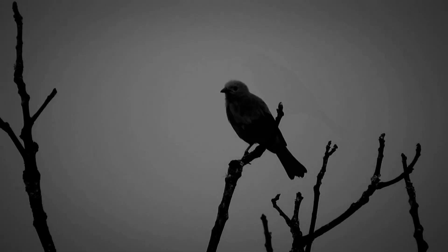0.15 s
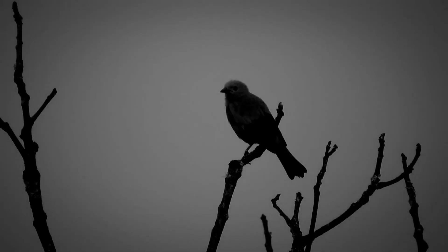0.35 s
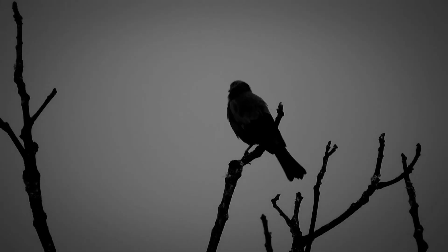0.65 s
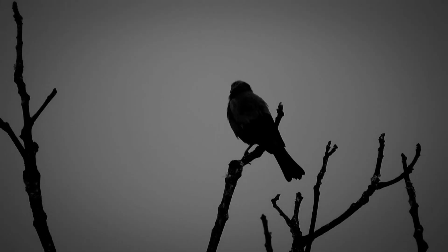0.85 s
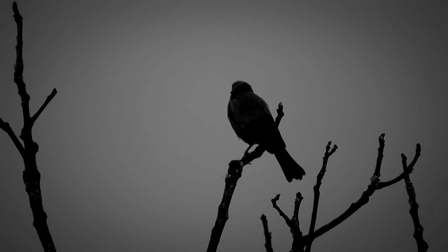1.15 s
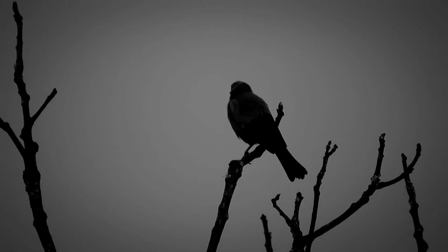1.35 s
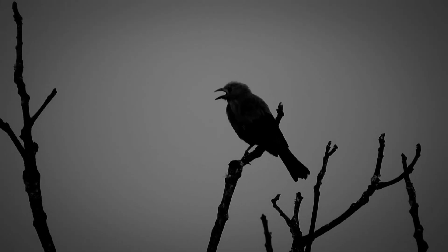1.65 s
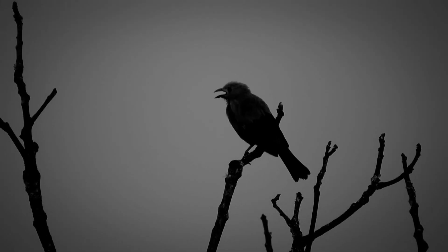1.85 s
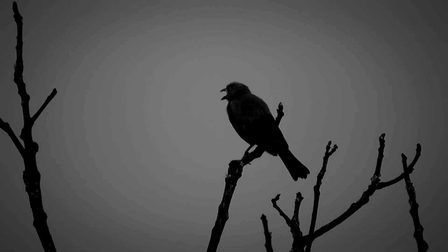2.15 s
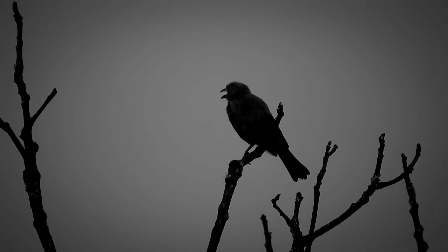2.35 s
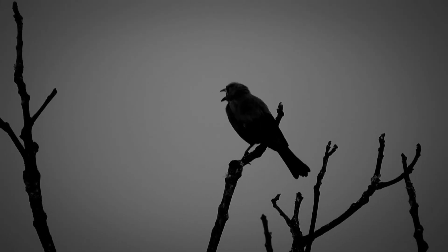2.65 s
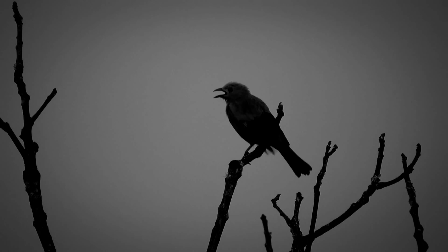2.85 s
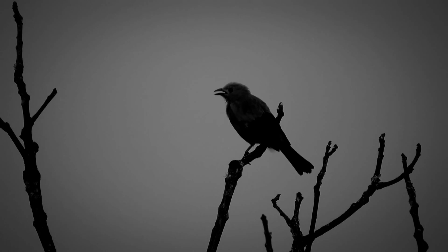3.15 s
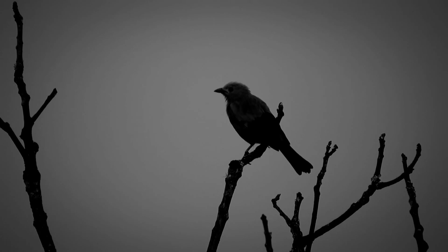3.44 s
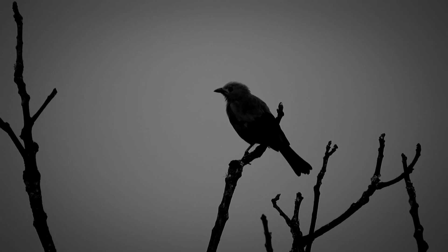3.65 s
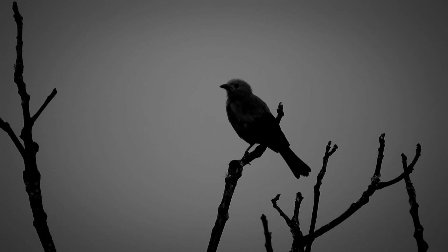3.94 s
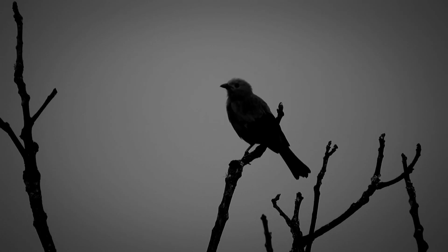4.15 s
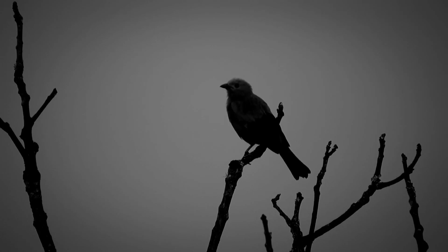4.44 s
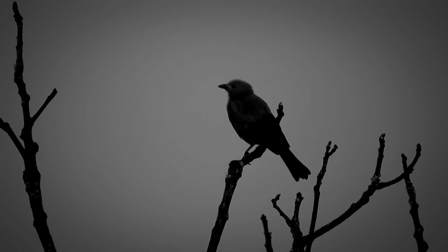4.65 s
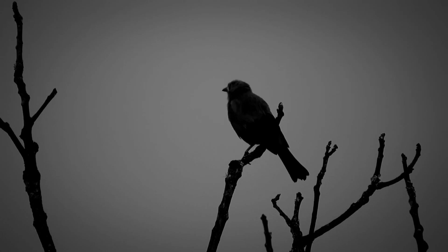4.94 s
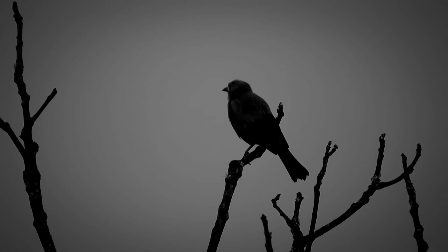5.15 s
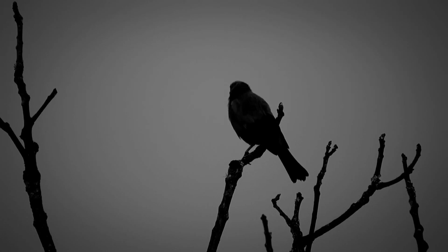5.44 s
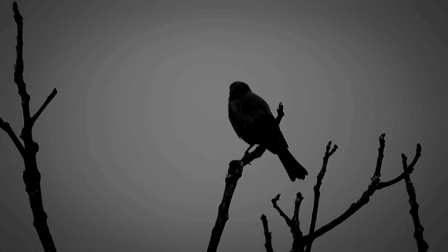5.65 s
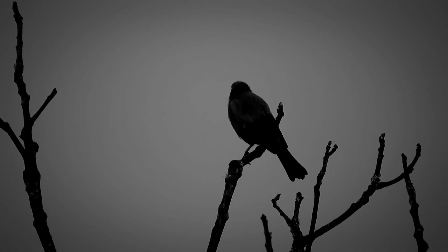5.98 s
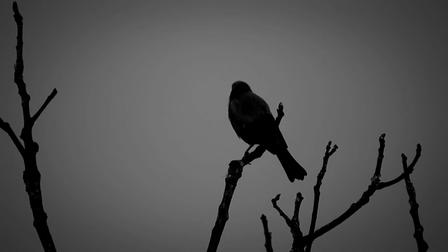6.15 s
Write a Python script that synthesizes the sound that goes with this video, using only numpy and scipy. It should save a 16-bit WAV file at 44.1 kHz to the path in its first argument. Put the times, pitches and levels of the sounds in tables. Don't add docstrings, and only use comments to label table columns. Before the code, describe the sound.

From 0 to about 1.9 seconds a small bird a few metres away rattles evenly, roughly nine notes a second. Each note is a very short, clean whistle dropping from about 6 kHz to below 2 kHz in a twenty-fifth of a second, heard as a sharp, liquid click. The run begins softer, is loudest from about 0.6 seconds, then eases slightly and stops. Quiet hum of distant traffic, faint insects and leaves remain. Around 2.5-3.3 seconds thin distant bird calls and chips sound, with tiny bright feather snaps and a soft beak tick at 2.85. A louder tick comes at 3.44, lone chips at 3.56 and 3.75, and a sharp tick at 4.18. From 4.3 notes return, spaced wider, quickening by 4.9 into a steady rattle, softening slightly until the end at about 6.3, with a faint far call near 6.0. Twigs and bushes add brief, dry echoes.

```python
import sys
import numpy as np
from scipy import signal
from scipy.io import wavfile
from scipy.ndimage import uniform_filter1d

SR = 44100
rng = np.random.default_rng(int(sys.argv[2]) if len(sys.argv) > 2 else 0)


def materialize(psi):
    bounded = np.clip(np.atleast_2d(psi).T, -1, 1)
    quanta = np.round(bounded * 32767).astype(np.int16)
    wavfile.write(sys.argv[1], SR, quanta)


def decibels_to_gain(level_db):
    exponent = np.asarray(level_db, float) / 20
    return 10 ** exponent


N = 278271


def unit(x):
    return x / np.sqrt(np.mean(x ** 2) + 1e-20)


def add(out, sound, start_s):
    i = round(start_s * SR)
    part = sound[max(-i, 0):len(out) - i]
    out[max(i, 0):max(i, 0) + len(part)] += part


def drift(rate_hz, size):
    knots = rng.standard_normal(int(size / SR * rate_hz) + 3)
    wander = np.interp(np.arange(size) * rate_hz / SR, np.arange(len(knots)), knots)
    return unit(uniform_filter1d(wander, int(SR / rate_hz)))


def resonate(x, hz, width_hz):
    r = np.exp(-np.pi * width_hz / SR)
    return signal.lfilter([(1 - r * r) / 2, 0, (r * r - 1) / 2], [1, -2 * r * np.cos(2 * np.pi * hz / SR), r * r], x)


def band_noise(noise, low_hz, high_hz):
    return signal.sosfilt(signal.butter(2, [low_hz, high_hz], "band", fs=SR, output="sos"), noise)


# pitch_hz, level_db (per Hz)
AIR_COLOUR = [(20, 1.5), (45, -2.5), (260, -6.5), (330, -15), (800, -20), (1050, -16.5), (1800, -22),
              (2600, -17.5), (4000, -26.5), (6300, -34), (8600, -29.5), (10000, -40), (13000, -44.5),
              (16000, -36)]
# time_s, level_db
AIR_SWELL = [(0.0, -53.5), (0.83, -52), (1.32, -53), (1.53, -52), (2.51, -56), (2.88, -55.5), (4.15, -55),
             (4.69, -52.5), (5.96, -53.5), (6.31, -53)]
# pitch_hz, width_hz, level_db
HUM = [
    (66, 29, -8),
    (112.4, 28, -14.5),
    (171.2, 20.3, -12.5),
    (243, 22, -15),
    (8500, 1300, -20),
]
# pitch_hz, level_db
WHINES = [(598, -76), (666, -75), (700, -81.5), (1141, -76), (1357, -78)]


def air():
    settle = SR // 4
    white = rng.standard_normal((2, N + settle))
    out = 0
    edges = 18 * 2 ** np.arange(0, 10, 1 / 3)
    colour_hz, colour_db = np.transpose(AIR_COLOUR)
    for k, (low, high) in enumerate(zip(edges, edges[1:])):
        db = np.interp(np.log(low * high) / 2, np.log(colour_hz), colour_db)
        band = band_noise(white[k % 2], low, high)
        flicker_db = 1.0 * drift(4, size=len(band))
        out = out + decibels_to_gain(db + flicker_db) * band
    out = out / np.std(band_noise(out, 60, 1200))
    for hz, width, db in HUM:
        out = out + decibels_to_gain(db) * unit(resonate(resonate(white[1], hz, width), hz, 0.72 * width))
    out = out[settle:] * decibels_to_gain(np.interp(np.arange(N) / SR, *np.transpose(AIR_SWELL)))
    for hz, db in WHINES:
        out = out + decibels_to_gain(db) * unit(resonate(resonate(white[0], hz, 6.9), hz, 6.9))[settle:]
    return out


# start_s, length_s, start_hz, end_hz, level_db
FAR_CALLS = [
    (2.51, .31, 2170, 2520, -65),
    (3.05, .07, 2530, 2510, -63),
    (3.148, .13, 2660, 2720, -63),
    (3.28, .16, 2640, 2560, -70),
    (6.03, .4, 2330, 2760, -59),
]
# multiple, level_db
FAR_OVERTONES = [(2, -12), (3, -14), (4, -22), (5, -21)]
# start_s, level_db, pitch_hz
CHIPS = [
    (2.69, -68, 5360),
    (2.731, -63, 5500),
    (2.935, -62.5, 4170),
    (3.045, -57.5, 3900),
    (4.33, -58, 7000),
    (4.4, -62, 8500),
    (4.48, -57, 7500),
    (4.3, -68, 10900),
]


def far_birds():
    out = np.zeros(N)
    for s, length, start_hz, end_hz, db in FAR_CALLS:
        u = np.linspace(0, 1, int(length * SR))
        glide_hz = start_hz + (end_hz - start_hz) * u ** 1.8
        phase = 2 * np.pi * np.cumsum(glide_hz * (1 + 0.016 * drift(250, size=len(u)))) / SR
        tone = (.9 + .4 * drift(201, size=len(u))) * np.sin(phase)
        for multiple, over_db in FAR_OVERTONES:
            tone += decibels_to_gain(over_db) * drift(200 * multiple, size=len(u)) * np.sin(multiple * phase)
        swell = np.minimum(np.minimum(u / .25, (1 - u) / .3), 1)
        add(out, decibels_to_gain(db + 6.5) * swell * tone, s)
    t = np.arange(SR // 10) / SR
    for s, db, hz in CHIPS:
        smudge = unit(resonate(resonate(rng.standard_normal(len(t)), hz, hz / 4), hz, hz / 4))
        add(out, decibels_to_gain(db) * smudge * t / 0.016 * np.exp(1 - t / 0.0165), s - .015)
    return out


# delay_ms, level_db
ECHOES = [(4.8, -28), (6.1, -17.5), (7.9, -20.5), (9.4, -21.5), (13.6, -23.5), (15.4, -25.5), (20, -28)]
# pitch_hz, level_db, t60_s
LEAF_SCATTER = [(1770, -48.5, .4), (2800, -48.5, 0.38), (4400, -51, 0.32), (7000, -47.5, .25),
                (12000, -47.5, 0.28)]


def bushes(x):
    t = np.arange(SR // 2) / SR
    response = np.zeros(len(t))
    for ms, db in ECHOES:
        response[int(ms * SR / 1000)] += decibels_to_gain(db)
    for hz, db, t60 in LEAF_SCATTER:
        band = band_noise(rng.standard_normal(len(t)), hz / 1.27, hz * 1.44)
        decay = decibels_to_gain(db - 60 * t / t60) * (1 + 2.31 * np.exp(-t / 0.02))
        response += band * decay * np.clip(t / .004, 0, 1)
    return signal.fftconvolve(x, response)[:len(x)]


# start_s, peak_db, pitch_hz
SNAPS = [
    (2.6444, -54, 9060),
    (2.663, -45, 8650),
    (2.7387, -47, 8710),
    (2.7694, -48, 8790),
    (2.801, -54, 8710),
    (2.9427, -54.5, 8500),
    (4.5565, -46, 8830),
    (4.579, -44, 8610),
]


def rustle():
    out = np.zeros(N)
    t = np.arange(300) / SR
    for s, db, hz in SNAPS:
        snap = resonate(resonate(rng.standard_normal(len(t)), hz, 4000), hz, 4000) * np.exp(-t / 0.0019)
        add(out, decibels_to_gain(db - 1.5) * snap / abs(snap).max(), s)
    return out


RASP_SIZE = 530


def tick(peak_db, length_ms, start_hz, end_hz, rasp_db):
    u = np.linspace(0, 1, int(length_ms * SR / 1000))
    phase = 2 * np.pi * np.cumsum(end_hz + (start_hz - end_hz) * np.exp(-u / 0.27)) / SR
    swell = (u / 0.34 * np.exp(1 - u / .32)) ** 2.53 * np.sqrt(1 - u)
    ping = decibels_to_gain(-26.5) * np.sin(2 * np.pi * 8200 * u * length_ms / 1000)
    slide = decibels_to_gain(peak_db) * swell * (np.sin(phase) + ping)
    rasp = unit(resonate(resonate(rng.standard_normal(RASP_SIZE), 3800, 2500), 3800, 2500))
    return np.r_[decibels_to_gain(rasp_db) * rasp * np.linspace(.2, 1, RASP_SIZE), slide]


# time_ms, level_db
ONSET = [(-2, -44.5), (1.47, -9.5), (2.5, -2.5), (5, -1)]
# time_ms (after 3300 Hz), pitch_hz, level_db
ENDING = [(0.01005, 3300, -2.5), (6.97, 2920, -8), (13.05, 2642, -11.5), (17.5, 2208, -19),
          (21.56, 1714, -36.5)]
# pitch_hz, level_db
OVERTONES = [(5500, -22.5), (7000, -7.5), (8500, 1.5), (10000, -8.5), (12500, -12), (16000, -5)]


def whistle(level_db, start_hz, mid_ms, low_ms, octave_db, low_db, waver, hiss):
    effort = start_hz / 5800
    on = np.array(ONSET)
    end = np.array(ENDING) * [effort ** 1.1, 1, 1]
    ms = on[0, 0] + np.arange(int((low_ms + end[-1, 0] - on[0, 0]) * SR / 1000)) * 1000 / SR
    size = len(ms)

    bends_ms = np.r_[on[0, 0], 0, .22 * mid_ms, .6 * mid_ms, mid_ms, low_ms + end[:, 0]]
    fall = start_hz - 4200
    pitches = np.r_[1.04 * start_hz, 1.012 * start_hz, start_hz - .12 * fall, start_hz - .62 * fall, 4200, end[:, 1]]
    hz = uniform_filter1d(np.exp(np.interp(ms, bends_ms, np.log(pitches))), size=90, mode="nearest")
    flap = .045 * (1 + .4 * waver[0]) * np.sin(2 * np.pi * 250 * ms / 1000 + 3 * waver[-1])
    slack = np.clip((ms - low_ms - 3) / 11, 0, 1)
    hz = hz * (1 + slack * (.015 * waver[-size:] + flap))

    late = np.clip((ms - low_ms) / 6 + .5, 0, 1)
    level_ms = np.r_[on[:, 0], max(mid_ms, on[-1, 0] + 1), low_ms + end[:, 0]]
    db = np.interp(ms, level_ms, np.r_[on[:, 1], 1.2, end[:, 2]])
    db = uniform_filter1d(db + low_db * late, size=40, mode="nearest")
    db = db + 0.57 * (1 + 3.3 * late) * waver[:size]

    phase = 2 * np.pi * np.cumsum(hz) / SR
    colour = np.transpose(OVERTONES)
    octave_level = octave_db + 3 + np.interp(2 * hz, *colour) + 4.5 * waver[::-1][:size]
    octave = decibels_to_gain(octave_level) * np.sin(2 * phase)
    twelfth = decibels_to_gain(-28.5 + 27 * (effort - 1.5) + np.interp(3 * hz, *colour)) * np.sin(3 * phase)
    under_phase = 2 * np.pi * np.cumsum(np.maximum(hz - .62 * start_hz, 0)) / SR
    under = decibels_to_gain(-36 + 30 * (effort - 1) - 1.66 * abs(ms - 2.5)) * np.sin(under_phase)
    return decibels_to_gain(level_db + db) * (np.sin(phase) + octave + twelfth + under + decibels_to_gain(-43) * hiss[:size])


# start_s, level_db, pitch_hz (at the start), fall_ms (down to 3300 Hz)
FIRST_RUN = [(-0.066, -15, 6100, 20.4), (0.0411, -15.5, 6140, 18.9), (0.1468, -17, 6380, 17.7),
             (0.2563, -16, 6270, 18.7), (0.3688, -12.5, 6330, 18.5), (0.473, -10, 6530, 18.3),
             (0.5812, -7.5, 6300, 17.2), (0.6898, -6, 6160, 17.1), (0.799, -6.5, 6190, 18.1),
             (0.9074, -6.5, 6120, 18), (1.0135, -7, 6116, 18.7), (1.1253, -7.5, 6180, 18.5),
             (1.2313, -7.5, 6130, 19.1), (1.3396, -7.5, 6029, 19.4), (1.4515, -7.5, 6230, 17.5),
             (1.5581, -8.5, 6160, 19.3), (1.6631, -8.5, 6140, 19.3), (1.7759, -10.5, 6210, 18),
             (1.8863, -11, 6150, 17.3)]
# start_s, level_db, pitch_hz, fall_ms
SECOND_RUN = [(3.5602, -13.5, 5080, 13.4), (3.7459, -9, 5400, 14), (4.3007, -10, 5340, 12),
              (4.4468, -12, 5640, 14.8), (4.6031, -14.5, 5700, 15.4), (4.7461, -12, 5570, 14.3),
              (4.8646, -11, 5690, 15.9), (4.974, -11, 5830, 18.6), (5.0841, -11, 5950, 17.8),
              (5.1908, -10.5, 6100, 17.5), (5.2977, -9.5, 5920, 19.1), (5.4031, -10, 5980, 18.6),
              (5.5139, -10, 6100, 19), (5.6245, -9, 5990, 16.5), (5.7375, -9.5, 5875, 17.8),
              (5.8504, -10.5, 6020, 17.2), (5.9552, -11.5, 6070, 18), (6.0599, -13.5, 6030, 18),
              (6.175, -12, 6130, 20.3), (6.285, -13.5, 6200, 18.6)]
# time_s, turn_db (extra toward the bushes), gape_db (beak), twig_ms (detour by the nearest twig)
POSE = [(0, 3, 8.5, 3.5), (.26, 3, 13.5, 1.5), (.42, -1, 8, 2.1), (.7, -1.5, -1.5, 1.8),
        (1.35, -1.5, 1.5, 1.85), (1.68, -0.9, 1, 1.8), (1.9, 1.4, -0.5, .9), (3.56, 1, 15, 1.2),
        (3.76, 1, 7, 0.73), (4.3, 1.3, 4.5, 0.69), (4.6, 3, 3.5, 0.89), (4.9, 3.5, 3.5, 1.08),
        (5.1, 3.5, 1.5, 1.1), (5.3, 3, -2.5, 1.63), (5.7, 1, -6, 1.62), (5.96, 3, -2.5, 1.62),
        (6.08, 4, 0, 2.1), (6.2, -0.8, 3.5, 1.3)]
# start_s, peak_db, length_ms, start_hz, end_hz, rasp_db
TICKS = [
    (2.8468, -27, 4.4, 5950, 2070, -50),
    (3.4391, -19, 4.5, 6040, 1960, -41.5),
    (4.1774, -16.5, 4.1, 6380, 1880, -45),
]


def bird(lead):
    straight, *sent = np.zeros((4, N + lead))
    pose_s, *pose = np.transpose(POSE)
    for k, (s, level_db, start_hz, low_ms) in enumerate(FIRST_RUN + SECOND_RUN):
        turn_db, gape_db, twig_ms = (np.interp(s, pose_s, c) for c in pose)
        last_step_ms = 7.5 + 0.27 * (low_ms - 18)
        octave_db = -33 + gape_db
        low_db = -0.84 + 0.5 * gape_db + 0.27 * turn_db
        start = s + ONSET[0][0] / 1000 + lead / SR
        white = rng.standard_normal(3000)
        hiss = unit(resonate(white, 8000, 2900) + decibels_to_gain(-21) * np.diff(white, n=2, prepend=[0, 0]))
        waver = drift(260, size=3000)
        sound = whistle(level_db, start_hz, low_ms - last_step_ms, low_ms, octave_db, low_db, waver, hiss)
        shift, spread = rng.standard_normal(2)
        add(straight, sound, start)
        add(straight, decibels_to_gain(-13.5 + 1.8 * turn_db) * sound, start + .001 * twig_ms * (1 + .08 * shift))
        add(straight, decibels_to_gain(-21.5 + 1.5 * spread) * sound, start + .001 * .66)
        add(sent[k % 3], decibels_to_gain(turn_db) * sound, start)
    for s, *shape in TICKS:
        sound = tick(*shape)
        start = s + (lead - RASP_SIZE) / SR
        add(straight, sound, start)
        add(sent[0], decibels_to_gain(1.0) * sound, start)
    return straight, sent


def scene():
    lead = SR // 10
    straight, sent = bird(lead)
    near = (straight + sum(bushes(x) for x in sent))[lead:]
    return (near + far_birds() + rustle() + air())[None]


def band_limit(x):
    return signal.sosfilt(signal.butter(12, 16980, fs=SR, output="sos"), x)


def record(dry):
    bent = dry + 0.018 * dry ** 2 - 0.036 * dry ** 3
    bent = bent + decibels_to_gain(3) * resonate(bent, 15600, 1000)
    bent = signal.sosfilt(signal.butter(1, 12, "high", fs=SR, output="sos"), bent)
    bent = signal.sosfilt(signal.cheby2(12, 40, 16400, fs=SR, output="sos"), bent)
    return band_limit(bent)


dry = scene()
out = record(dry)
materialize(out)
```